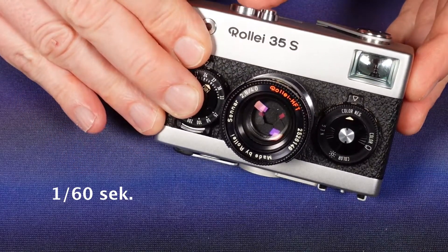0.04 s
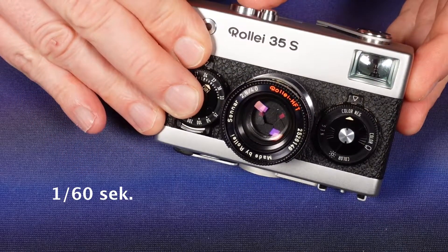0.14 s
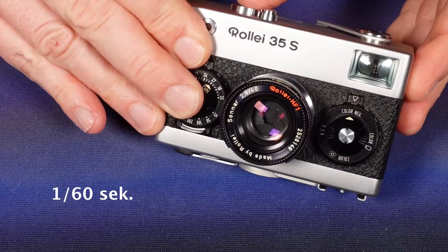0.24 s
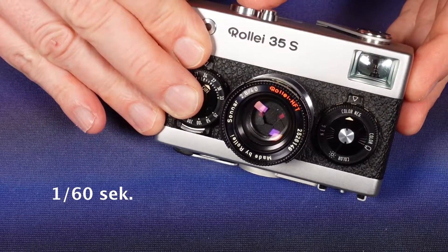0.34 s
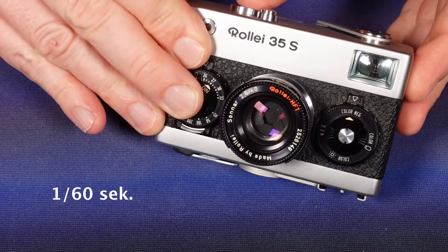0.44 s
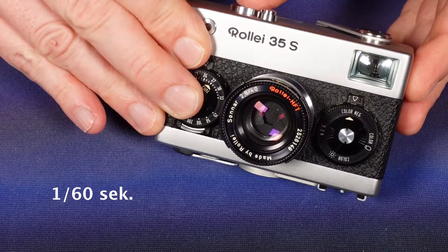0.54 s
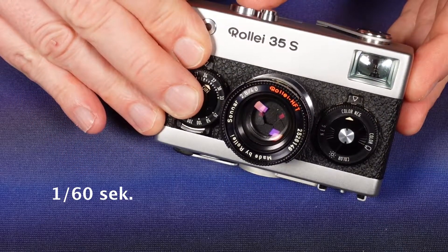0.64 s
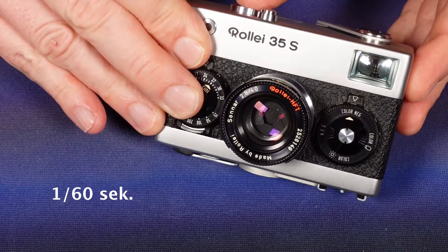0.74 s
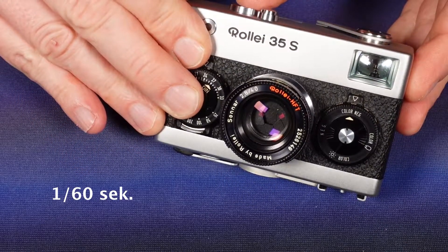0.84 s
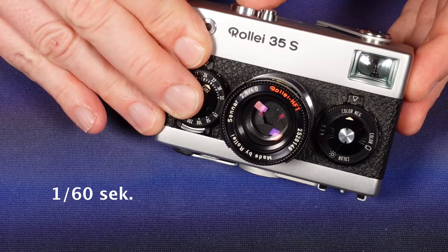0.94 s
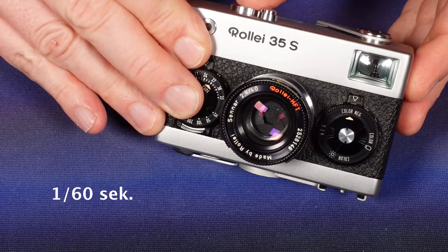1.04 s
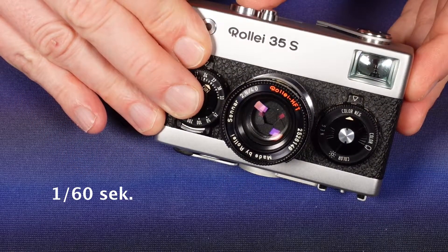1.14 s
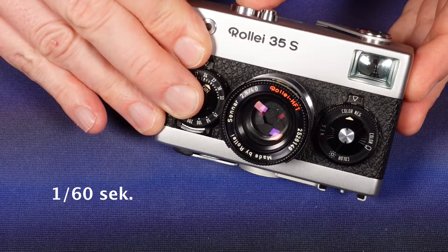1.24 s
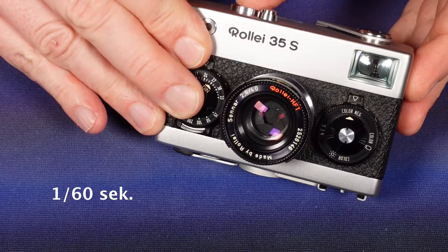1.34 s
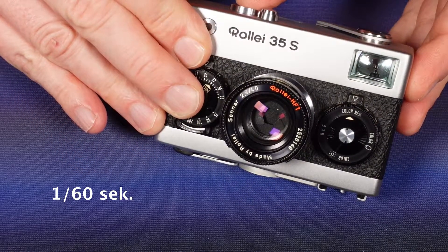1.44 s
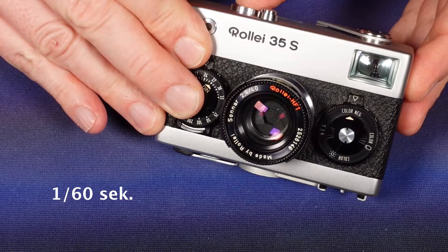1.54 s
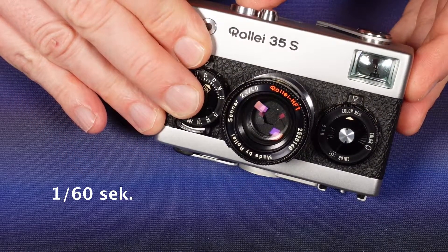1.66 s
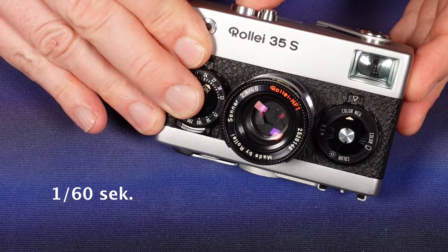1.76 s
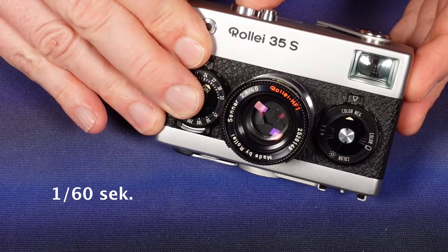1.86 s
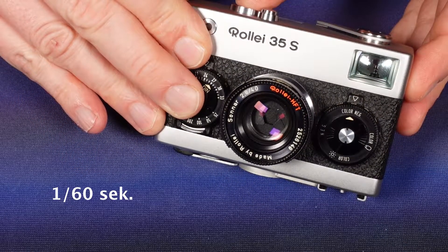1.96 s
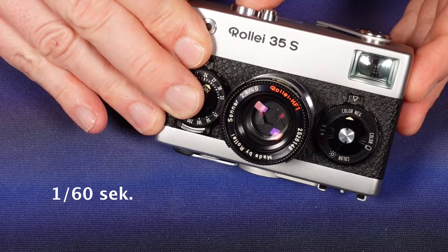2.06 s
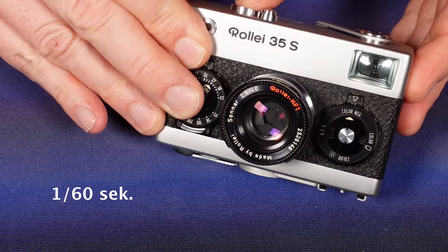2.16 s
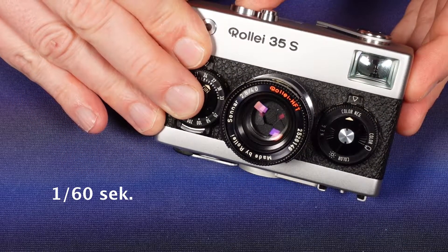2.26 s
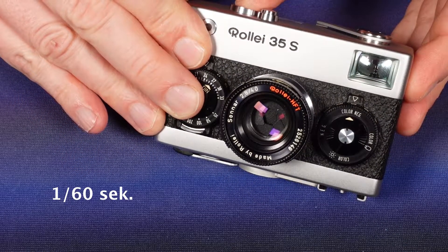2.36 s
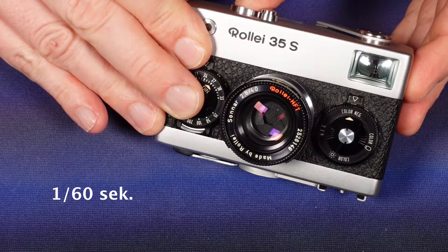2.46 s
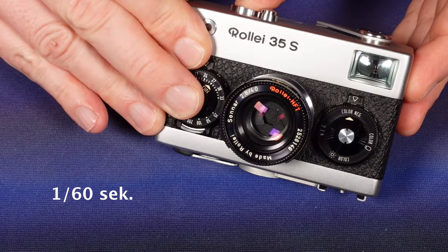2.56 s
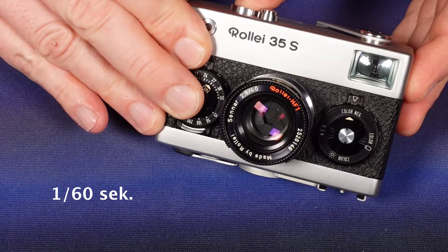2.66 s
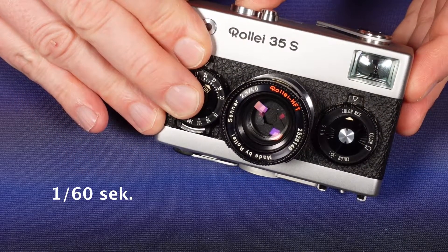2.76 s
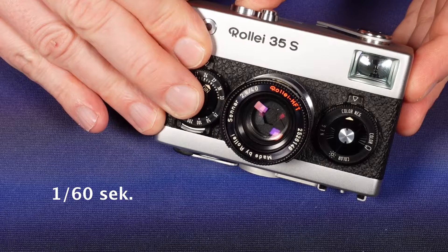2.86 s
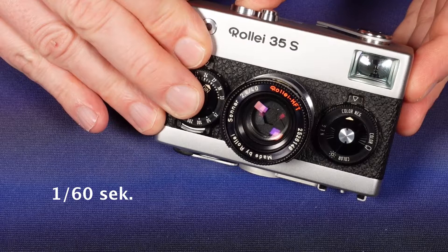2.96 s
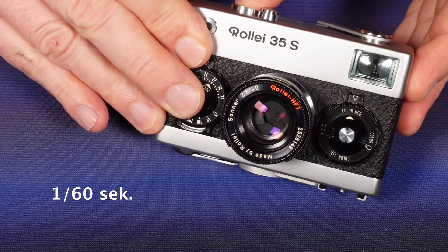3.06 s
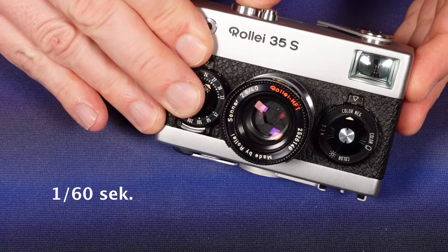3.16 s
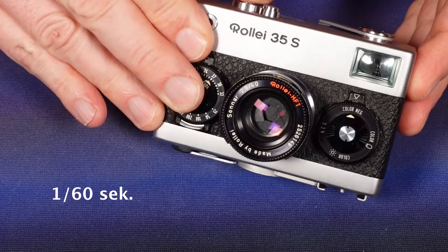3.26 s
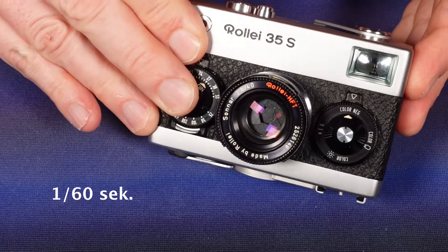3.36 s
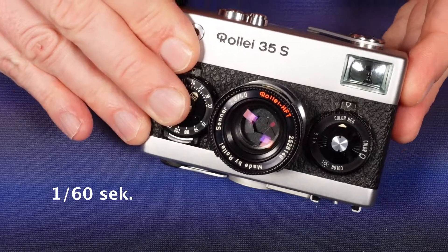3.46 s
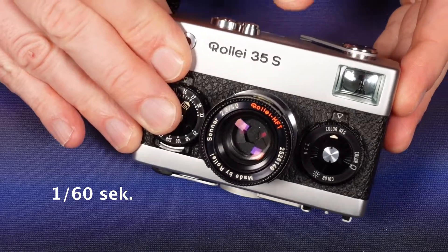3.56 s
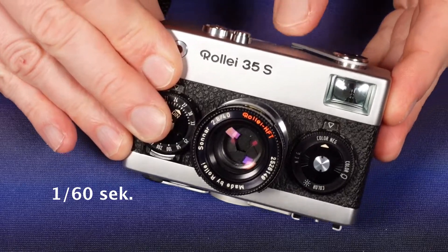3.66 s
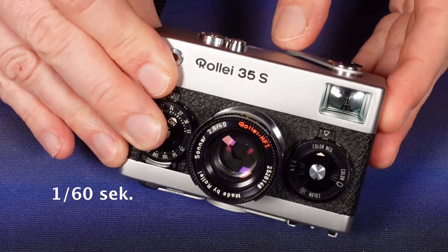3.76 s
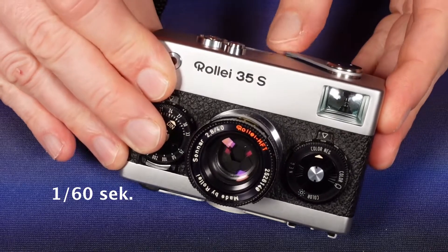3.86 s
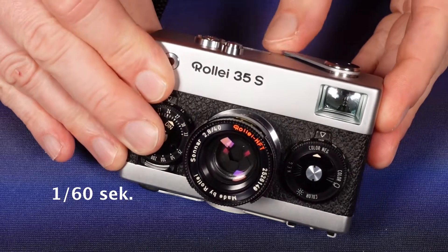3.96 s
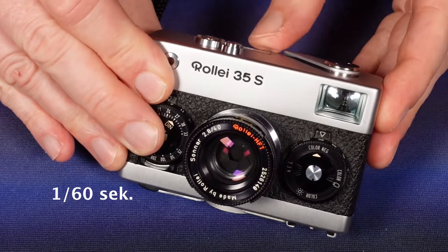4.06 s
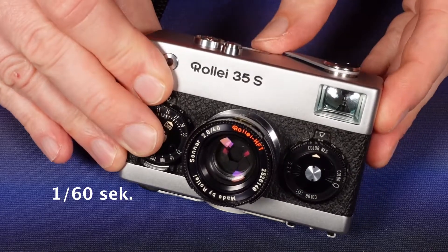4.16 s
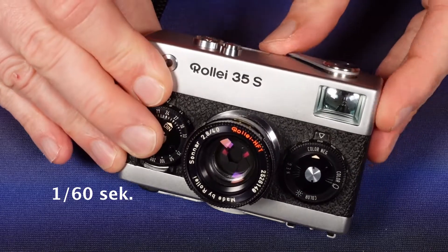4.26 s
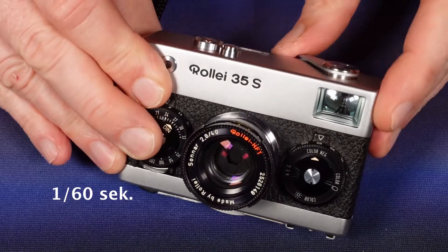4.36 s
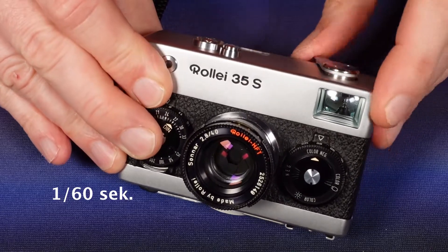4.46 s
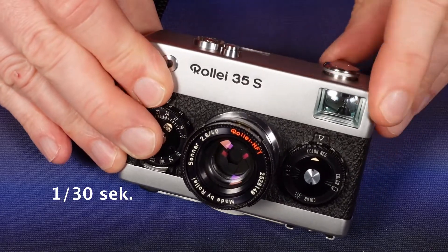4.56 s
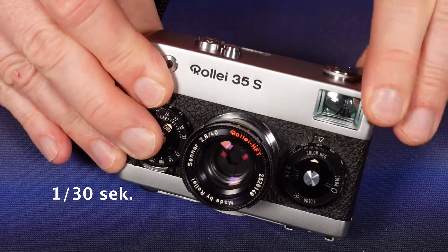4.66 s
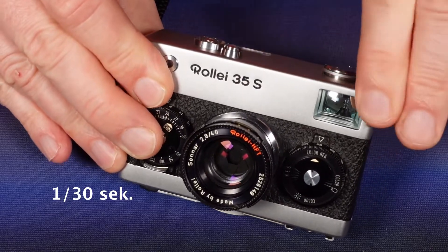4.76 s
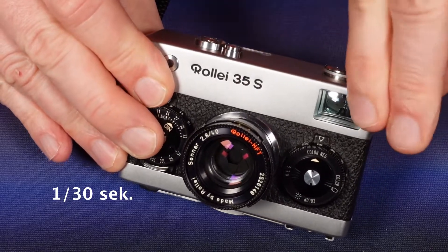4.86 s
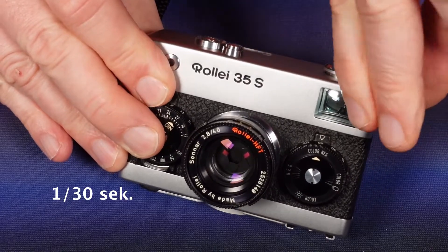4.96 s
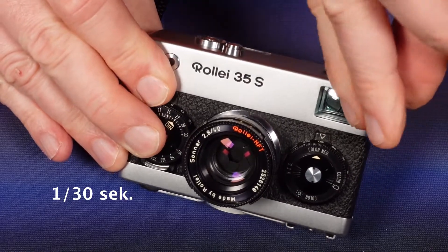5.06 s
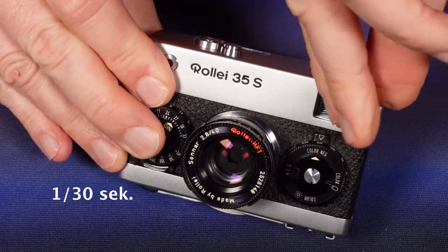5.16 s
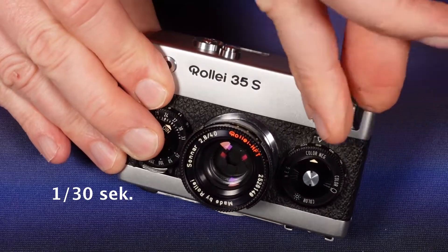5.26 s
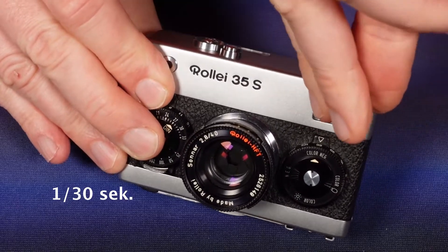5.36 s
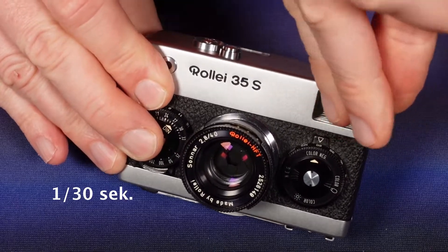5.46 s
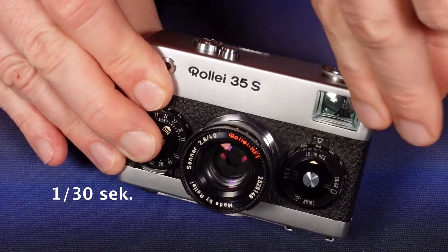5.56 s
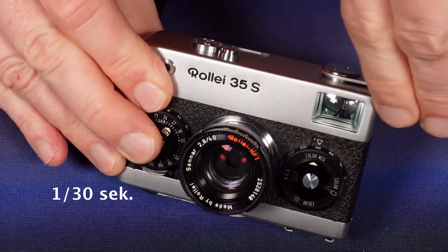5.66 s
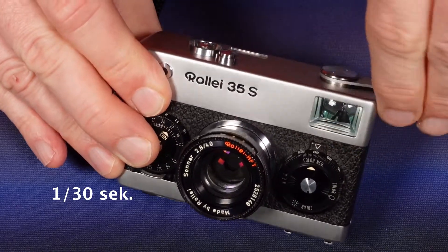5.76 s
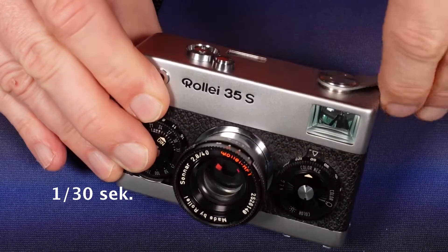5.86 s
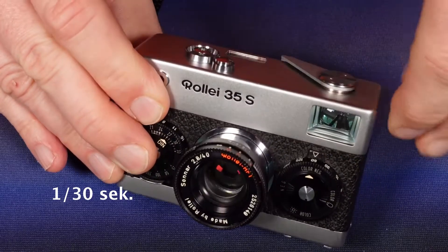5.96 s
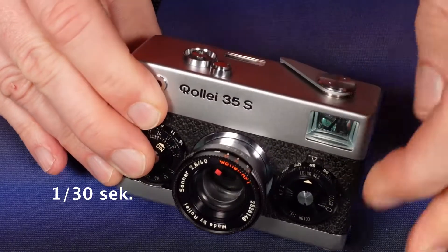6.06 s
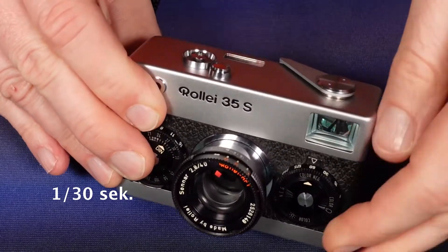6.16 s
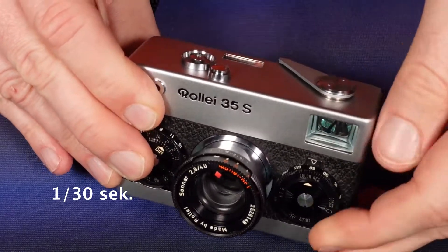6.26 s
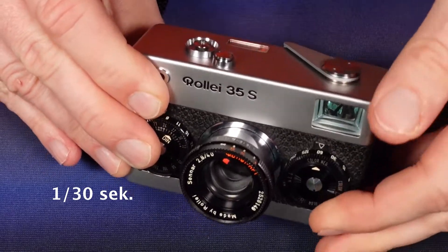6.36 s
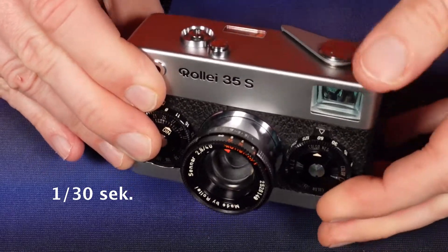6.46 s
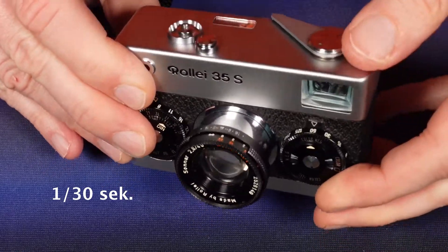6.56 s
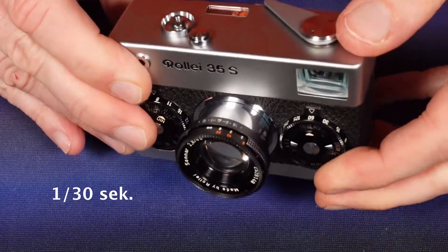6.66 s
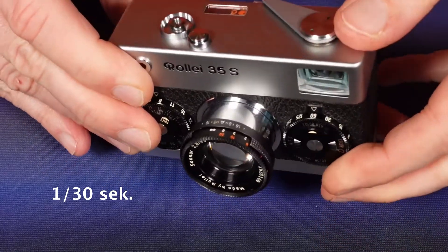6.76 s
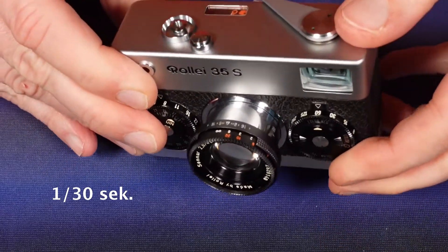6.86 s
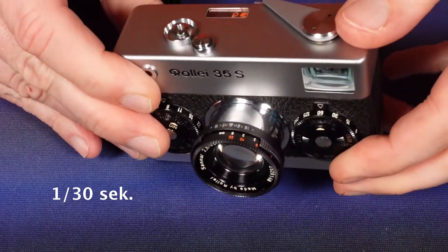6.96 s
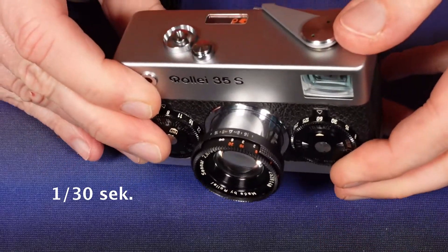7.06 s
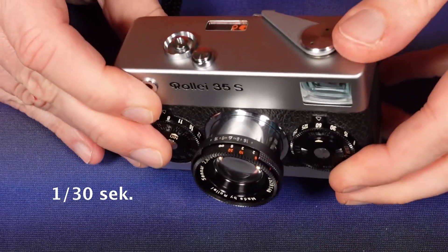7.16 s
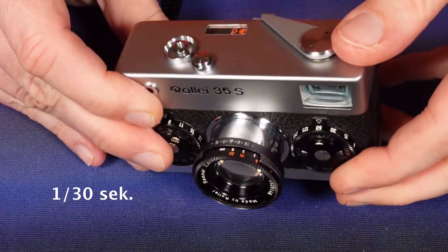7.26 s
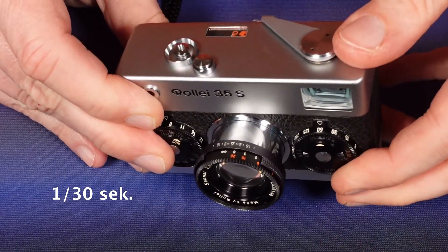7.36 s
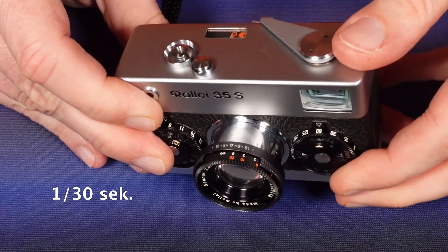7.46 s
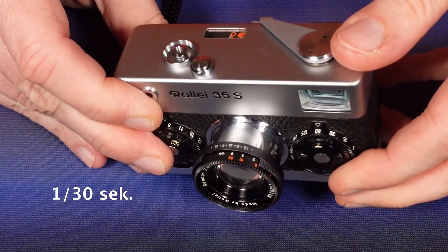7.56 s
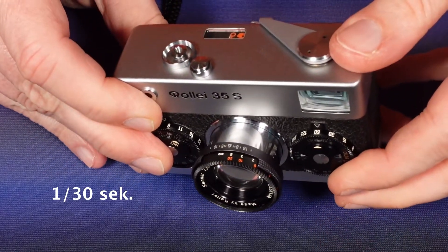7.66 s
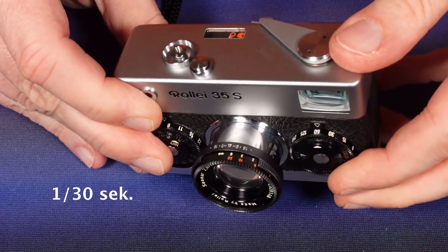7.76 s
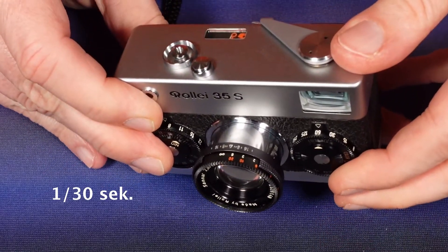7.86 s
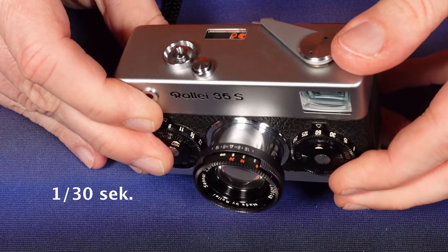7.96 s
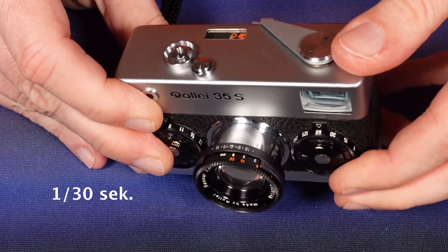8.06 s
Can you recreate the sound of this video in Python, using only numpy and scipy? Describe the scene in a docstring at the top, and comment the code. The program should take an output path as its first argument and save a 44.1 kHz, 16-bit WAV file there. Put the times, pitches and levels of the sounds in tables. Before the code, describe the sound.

Near silence with a faint clock tick, a sharp double shutter click, light handling taps, a ratcheting lever stroke, a loud metallic snap back.

```python
"""A leaf shutter opens and closes in a small metal film camera, handled close to the microphone.
Noise bursts ring its housing; brief pushes ring the hollow case and single impulses its plates, under cracks.
The wind lever swings out over a clicking ratchet, latches and snaps home: more cracks, and rings from grains.
Fingers rub and bump the case as coloured grains and slips; low thumps are slow decaying cosines.
Behind lie diffuse echoes, a quiet room of steady noise and a faint far tick about once a second."""
import sys
import numpy as np
from scipy import signal
from scipy.fft import rfft, irfft, next_fast_len
from scipy.io import wavfile
from scipy.ndimage import uniform_filter1d

SR = 44100
rng = np.random.default_rng(int(sys.argv[2]) if len(sys.argv) > 2 else 0)


def pcm_store(signal):
    """Save signal as 16-bit PCM."""
    levels = np.round(np.clip(np.atleast_2d(signal), -1, 1) * 32767)
    wavfile.write(sys.argv[1], SR, levels.astype(np.int16).T)


N = 357651
TIME = np.arange(N) / SR   # seconds

# Shutter blades reach their open and closed stops. Each row: start in seconds, level in dB.
BLADE_STOPS = [(2.227, -3), (2.245, -2.5)]
# Ringing of the shutter housing. Each row: frequency in Hz, width in Hz, level in dB.
HOUSING_MODES = [(520, 80, 14), (2050, 230, 11), (3100, 200, -5.5), (4350, 75, -6.5), (5620, 90, 4.5),
                 (6520, 160, -4), (9210, 84, -1), (11700, 160, -0.5)]
# Metal parts strike inside the case: the shutter fires, the button comes back up, the gears engage,
# the lever latches and meets its stop, snaps home, and settles. Each row: start in seconds,
# crack level in dB, hollow case ring in dB, plate ring in dB, treble lift in dB.
METAL_STRIKES = [ (2.2222, -18, 7, -12.5, -6.5), (2.2247, 3, -6.5, -14, 4), (2.243, 1.5, -17, -13, 4),
                 (2.2458, -13, 9.5, -8, 0), (2.2662, -18, -12, -5, 4), (3.1541, -36, -9, -7, -14),
                 (3.1742, -37.5, -3, -5, 7), (4.6531, -18, 6, 10.5, -3), (5.171, -9, -18, -1.5, 14.5),
                 (5.183, -25, -14, -12, 5), (5.2057, -17, 2.5, 8, 1.5), (5.2082, -9, -7, -5, -1),
                 (5.2123, -18, -4.5, -7, -7), (5.85, -10, -12, -9.5, 6.5), (5.911, -17.5, -13, -10, -2),
                 (5.9172, -12.5, -8, -7, 2.5), (5.9227, 13, -14, 1.5, 3.5), (5.932, -1.5, -15.5, -2, -5.5),
                 (6.5935, -35, -24, -12, 5)]
# Base colour of a metal crack. Each row: frequency in Hz, spectral level in dB.
CRACK_COLOUR = [(150, -8), (400, -4), (800, -3.5), (1300, -2.5), (2100, 0), (3300, 0), (5500, -1),
                (7500, -5), (9500, -1), (12000, -6), (16000, -10.5)]
# Hollow modes of the case. Each row: frequency in Hz, width in Hz, level in dB.
CASE_MODES = [(185, 55, 22), (511, 110, 16.5), (614, 33, 2)]
# Ringing plates and springs. Each row: frequency in Hz, width in Hz, level in dB.
PLATE_MODES = [(1589, 30, 4), (2010, 120, -1), (2640, 50, -2), (2828, 67, 4), (3060, 40, -3),
               (3475, 37, 2.5), (4980, 30, 0.5), (5640, 30, -1.5), (7150, 19, -2), (8000, 43, -3),
               (9230, 31, -2.5)]
# The pawl drops over each tooth. Each row: start in seconds, relative level in dB.
RATCHET_TEETH = [(4.446, -21), (4.4995, -19.5), (4.5386, -17), (4.5777, -14.5), (4.6185, -14.5),
                 (4.6727, -10), (4.694, -13), (4.714, -10), (4.7405, -12), (4.7658, -14.5), (4.7935, -15.5),
                 (4.8309, -15), (4.8594, -14), (4.8868, -15), (4.9173, -13.5), (4.9494, -15), (4.9879, -12),
                 (5.03, -13.5), (5.0645, -15), (5.1387, -16)]
# Ringing of the pawl. Each row: frequency in Hz, width in Hz, relative level in dB.
PAWL_MODES = [(1800, 45, -1.5), (2290, 120, -4.5), (3350, 210, -6.5), (5070, 440, -4.5), (6100, 470, -8),
              (7460, 160, -7), (9400, 1400, -6.5), (11300, 470, -11), (13000, 320, -12)]
# The lever spring pings on the way back. Each row: start in seconds, relative level in dB.
SPRING_PINGS = [(5.5927, -12.5)]
# Ringing of the lever spring. Each row: frequency in Hz, width in Hz, relative level in dB.
SPRING_RING = [(3740, 77, -4), (5900, 210, -7), (6650, 100, -9), (10300, 210, -14.5), (13790, 310, -16.5)]
# The lever turns on its pivot, out, back and home. Each row: start in seconds, length in seconds, level in dB.
LEVER_SWINGS = [(4.2, .18, -60), (4.425, .045, -47), (4.48, .66, -55.5), (5.45, .27, -53), (5.79, .11, -44)]
# Ringing of the rubbed pivot. Each row: frequency in Hz, width in Hz, relative level in dB.
PIVOT_RING = [(679, 480, -0.5), (1770, 370, 4), (2533, 500, -9), (3500, 600, -13)]
# The thumb brushes the top plate. Each row: start in seconds, length in seconds, level in dB.
THUMB_BRUSHES = [(3.98, 0.19, -53.5), (6.33, 0.4, -57)]
# Ringing of the brushed top plate. Each row: frequency in Hz, width in Hz, relative level in dB.
TOP_PLATE_MODES = [(1680, 690, -4), (3080, 2100, -1), (5020, 510, -0.5)]
# Duller knocks of outer parts under the fingers. Each row: start in seconds, relative level in dB,
# hollow case ring in dB, low-pass corner of the contact in Hz.
PART_KNOCKS = [(3.068, -43, -12, 3000), (3.1078, -40.5, -16, 3000), (3.213, -37.5, -16, 5000),
               (3.2866, -44, -18, 4000), (3.352, -43, -17, 5000), (3.8268, -22, -19, 500),
               (4.2207, -42, -10, 2490), (4.3975, -38, -9, 4500), (4.821, -36, 5.5, 1500),
               (5.8015, -30, -4, 2206), (5.8190, -20.5, 1, 2300), (5.8702, -29, -6, 3000),
               (6.29, -33, 3, 4000), (7.304, -15, -12, 4930), (7.4776, -24, -5, 3000)]
# Ringing of the outer parts. Each row: frequency in Hz, width in Hz, relative level in dB.
OUTER_PART_MODES = [(980, 220, -2), (1270, 190, 4.5), (1950, 1100, -3), (2610, 280, 4.5), (3050, 800, 2),
                    (4070, 130, -2), (9000, 4000, -3)]
# Dull low thumps of the camera: shutter, latch and lever blows, and bumps of the hand.
# Each row: start in seconds, level in dB, contact time in seconds.
LOW_THUMPS = [(2.226, -24, .012), (2.243, -31, .001), (3.114, -41, .004), (3.175, -36.5, .004),
              (3.8228, -10.5, .005), (4.089, -34, .005), (4.252, -43, .003), (4.28, -39, .003),
              (4.79, -31, .005), (5.172, -31.5, .004), (5.207, -22, .004), (5.228, -16.5, .013),
              (5.925, -16, .0045), (5.949, -21, .004), (6.207, -28, .004), (6.423, -34, .008),
              (7.299, -20.5, .0075)]
# The held camera rocks. Each row: frequency in Hz, level in dB, time to fall 60 dB in seconds.
ROCKING_MODES = [(37, -9, .28), (61, -1, .24), (86, -3, .17), (140, -1, .11), (170, 4, 0.078),
                 (315, 4, .04)]
# Skin slides on the case. Each row: start in seconds, length in seconds, level in dB.
SKIN_SLIDES = [(3.12, .1, -51.5), (3.3, .26, -59.5), (3.61, .17, -52), (4.56, .29, -44.5), (5.75, .2, -50)]
# Colour of sliding skin. Each row: frequency in Hz, spectral level in dB.
SKIN_COLOUR = [(200, 11), (450, 9), (700, 4), (1100, 2.5), (1800, 0), (3500, -1), (6000, -7.5), (10000, -9),
               (16000, -16)]
# The grip shifts. Each row: start in seconds, length in seconds, rumble level in dB.
GRIP_SHIFTS = [(3.02, 0.59, -45.5), (3.7, 0.92, -43.5), (4.6, .45, -37), (5.0, .85, -44), (5.8, .68, -39),
               (7.25, 0.39, -48)]
# Colour of the grip's rumble. Each row: frequency in Hz, spectral level in dB.
RUMBLE_COLOUR = [(20, 1), (55, 1), (100, -7), (180, -6.5), (300, -20), (600, -29.5), (1500, -64.5)]
# Colour of the far tick. Each row: frequency in Hz, spectral level in dB.
FAR_TICK_COLOUR = [(200, -5), (400, 3), (770, 9), (1000, 1), (1700, -6), (2600, -6.5), (3600, -2),
                   (4700, -19), (6000, -4.5), (7500, -17), (15000, -22.5)]
# Colour of the still room. Each row: frequency in Hz, relative spectral level in dB.
QUIET_COLOUR = [(12, -23.5), (20, 1.5), (34, -4.5), (49, -15), (78, -13), (115, -27.5), (191, -13.5),
                (238, -20.5), (323, -24), (372, -30), (505, -32.5), (856, -34.5), (1300, -38.5),
                (8160, -41), (15500, -43.5)]
# How long the echo hangs. Each row: frequency in Hz, time to fall 60 dB in seconds.
ECHO_T60 = [(150, 0.13), (600, .5), (1500, 0.55), (3800, .5), (8000, 0.41), (15000, 0.19)]
# How strong the echo is. Each row: frequency in Hz, relative echo level in dB.
ECHO_LEVEL = [(150, -9.5), (600, -12.5), (1500, -17), (3800, -13.5), (8000, -15), (15000, -15.5)]

PUSH = np.hanning(12)   # the shape of one brief push, in samples
STRIKE_FADE_S = .0027   # decay time constant of a metal crack
PAWL_VARY_DB, PAWL_VARY_SHARE = 2.5, .02   # scatter from tooth to tooth: level, share of pitch
# the film transport gears take up the load, then run free
GEAR_START_S, GEAR_HOLD_S, GEAR_DB, GEAR_SAG_DB_PER_S = 4.648, 0.063, -31.5, 38
STROKE_FULLNESS = 0.72   # power of the arch that every stroke follows; lower is flatter
STROKE_UNEVEN_DB, STROKE_UNEVEN_HZ = 1.5, 45   # how much and how fast a stroke catches and frees itself
# a fingertip judders over the case, faster and lighter as it goes
JUDDER_START_S, JUDDER_HOLD_S, JUDDER_DB, JUDDER_SAG_DB_PER_S = 6.203, .078, -22, 135
JUDDER_SLIPS_PER_S, JUDDER_GAINS_SLIPS_PER_S = 185, 65   # at the start; added by the end
CLOCK_FIRST_S, CLOCK_PERIOD_S = .478, 1.001
TICK_DB, TOCK_DB = -51.5, -55.5   # tick and tock take turns
QUIET_DB = -48.5
CUTOFF_HZ = 15900


def from_db(db):
    """Turn decibels into gain."""
    return 10 ** (np.asarray(db) / 20)


def rms_one(x):
    """Bring a sound to rms 1."""
    return x / np.sqrt(np.mean(x ** 2) + 1e-20)


def at_hz(points, hz):
    """Read a table on a log-frequency axis."""
    f, value = np.transpose(points)
    return np.interp(np.log(np.maximum(hz, 1)), np.log(f), value)


def add(out, s, sound):
    """Mix a sound in at a given time."""
    at = round(s * SR)
    out[at:at + len(sound)] += sound[:N - at]


def colour(x, spectrum):
    """Give steady noise a spectrum; rms 1."""
    size = next_fast_len(len(x))
    gain = from_db(at_hz(spectrum, np.fft.rfftfreq(size, 1 / SR)))
    return rms_one(irfft(rfft(x, size) * gain, size)[:len(x)])


def low_pass(x, hz):
    """Dull a sound above a corner frequency."""
    return signal.sosfilt(signal.butter(2, hz, fs=SR, output="sos"), x)


def resonate(x, modes):
    """Ring parallel resonances; a wider one dies sooner."""
    out = 0
    for hz, width, db in modes:
        r = np.exp(-np.pi * width / SR)
        poles = [1, -2 * r * np.cos(2 * np.pi * hz / SR), r * r]
        ring = signal.lfilter([1, 0, -1], poles, x + 1e-18)
        out = out + from_db(db) * (1 - r * r) / 2 * ring
    return out


def burst(spectrum, rise, fade, size=4096):
    """Countless short-lived modes sound as noise that swells and dies."""
    t = TIME[:size]
    noise = colour(rng.standard_normal(size), spectrum)
    noise = noise / np.sqrt(uniform_filter1d(noise ** 2, size=90) + 1e-9)   # even out the loudness
    return noise * np.minimum(t / rise, 1) * np.exp(-np.maximum(t - rise, 0) / fade)


def grains(per_s, spread_db):
    """Tiny random catches between two rubbing surfaces."""
    sizes = from_db(spread_db * np.minimum(rng.exponential(1, N), 4))
    signs = rng.choice([-1, 1], N)
    return sizes * signs * (rng.random(N) < per_s / SR)


def strokes(rows):
    """Gain over time: each stroke gathers speed and slows again in one uneven arch."""
    arch = np.hanning(65) ** (abs(STROKE_FULLNESS) / 2)
    speed = np.zeros(N)
    for start, length, db in rows:
        speed += from_db(db) * np.interp(TIME, np.linspace(start, start + length, len(arch)), arch)
    catching = rms_one(low_pass(rng.standard_normal(N), STROKE_UNEVEN_HZ))
    return speed * from_db(STROKE_UNEVEN_DB * catching)


def pressure(start, hold, sag_db_per_s, attack, release):
    """Gain over time of a push that builds fast, sags while held and lets go."""
    t = np.maximum(TIME - start, 0)
    letting_go = np.exp(-np.clip((t - attack - hold) / release, 0, 20))
    return np.minimum(t / attack, 1) * from_db(-sag_db_per_s * t) * letting_go


def shutter(rise=0.00065, fade=0.0047):
    """Each stop of the blades sets their housing singing briefly."""
    stops = np.zeros(N)
    for s, db in BLADE_STOPS:
        add(stops, s, from_db(db) * burst([(1000, -5.5), (16000, -3.5)], rise, fade))
    return resonate(stops, HOUSING_MODES)


def strikes(rise=0.0008, treble_hz=4500):
    """Shutter blades, latch and lever hit their stops and set the case and its plates ringing."""
    crack, shove, flex = np.zeros((3, N))
    for s, db, hollow_db, plate_db, treble_db in METAL_STRIKES:
        spectrum = [(hz, base + treble_db * hz ** 2 / (hz ** 2 + treble_hz ** 2)) for hz, base in CRACK_COLOUR]
        hit = from_db(db) * burst(spectrum, rise, STRIKE_FADE_S)
        add(crack, s, hit)
        # the slow modes feel a blow as one short push
        add(shove, s, from_db(db + hollow_db) * PUSH)
        # the plates take a share of its energy at once
        add(flex, s, [from_db(plate_db) * np.sqrt(np.sum(hit ** 2))])
    return crack + resonate(shove, CASE_MODES) + resonate(flex, PLATE_MODES)


def ratchet(rise=0.00061, fade=0.0019, ring_db=1.5, tick_db=-10.0):
    """The pawl drops from tooth to tooth, its modes scattered a little each time."""
    clicks = np.zeros(N)
    for s, db in RATCHET_TEETH:
        drop = from_db(db) * burst([(800, -9.5), (2000, -10.5), (5000, -6), (16000, -5)], rise, fade)
        modes = []
        for hz, width, mode_db in PAWL_MODES:
            modes.append((hz * rng.normal(1, PAWL_VARY_SHARE), width, rng.normal(mode_db, PAWL_VARY_DB)))
        add(clicks, s, from_db(ring_db) * resonate(drop, modes) + from_db(tick_db) * drop)
    return clicks


def gears():
    """Loaded gear teeth mesh in fine grains and whirr through the same steel as the pawl."""
    mesh = grains(per_s=1300, spread_db=3.5)
    load = pressure(GEAR_START_S, GEAR_HOLD_S, GEAR_SAG_DB_PER_S, attack=0.0073, release=0.022)
    return from_db(GEAR_DB) * load * rms_one(resonate(mesh, PAWL_MODES) + .9 * mesh)


def spring(ring_db=3.0, tick_db=-7.5):
    """A brief kick rings the spring in one light ping as the lever swings back."""
    kick = np.zeros(N)
    for s, db in SPRING_PINGS:
        snap = burst([(1200, -18), (2500, 4.0), (6000, -8), (15000, -15)], rise=.0007, fade=.001)
        add(kick, s, from_db(db) * snap)
    return from_db(ring_db) * resonate(kick, SPRING_RING) + from_db(tick_db) * kick


def rubbing():
    """Fine friction rings the lever's pivot low and the top plate high."""
    friction = grains(per_s=2000, spread_db=4.0)
    pivot = strokes(LEVER_SWINGS) * rms_one(resonate(friction, PIVOT_RING))
    top_plate = strokes(THUMB_BRUSHES) * rms_one(resonate(friction, TOP_PLATE_MODES))
    return pivot + top_plate


def knocks(rise=0.00061, fade=0.0013, ring_db=1.5, dry_db=-4.5):
    """Parts damped by the hand knock briefly; a softer contact is duller."""
    taps, shove = np.zeros((2, N))
    for s, db, hollow_db, bright_hz in PART_KNOCKS:
        contact = burst([(100, 0.00035), (16000, 0)], rise, fade)
        add(taps, s, from_db(db) * low_pass(contact, bright_hz))
        add(shove, s, from_db(db + hollow_db) * PUSH)
    ring = from_db(ring_db) * resonate(taps, OUTER_PART_MODES)
    return ring + from_db(dry_db) * taps + resonate(shove, CASE_MODES)


def thumps():
    """Blows and bumps rock the camera for a few slow cycles; a longer contact is duller."""
    out, t = np.zeros(N), TIME[:SR // 2]
    rocking = sum(from_db(db - 60 * t / t60) * np.cos(2 * np.pi * hz * t) for hz, db, t60 in ROCKING_MODES)
    for s, db, contact_s in LOW_THUMPS:
        push = np.sin(np.pi * np.minimum(t / contact_s, 1)) ** 2
        add(out, s, -from_db(db) * signal.fftconvolve(rocking, push / push.sum()))
    return out


def judder(skin, unsteady=0.2, grit_db=-15.5, scrape_db=-17.0):
    """A fingertip sticks and slips at an unsteady, rising rate; each slip throbs and scratches."""
    progress = np.clip((TIME - JUDDER_START_S) / JUDDER_HOLD_S, 0, 1)
    per_s = JUDDER_SLIPS_PER_S + JUDDER_GAINS_SLIPS_PER_S * progress
    wander = rms_one(low_pass(rng.standard_normal(N), 90.4))
    phase = np.cumsum(per_s * np.exp(unsteady * wander)) / SR
    slips = np.diff(np.floor(phase), prepend=0)   # one impulse per slip
    throb = rms_one(low_pass(resonate(slips, [(217, 62, 14), (550, 145, -7)]), 570))
    scratch = low_pass(slips, 390) * rng.standard_normal(N)
    grit = rms_one(resonate(scratch, [(3000, 650, 0)]))
    press = pressure(JUDDER_START_S, JUDDER_HOLD_S, JUDDER_SAG_DB_PER_S, attack=.011, release=0.0054)
    return from_db(JUDDER_DB) * press * (throb + from_db(grit_db) * grit + from_db(scrape_db) * skin)


def fingers(grip_rub_db=-17.0):
    """Skin slides in fine grains, judders, and rumbles through the grip."""
    skin = colour(grains(per_s=6000, spread_db=2.5), SKIN_COLOUR)
    rumble = colour(rng.standard_normal(N), RUMBLE_COLOUR)
    grip = strokes(GRIP_SHIFTS) * (rumble + from_db(grip_rub_db) * skin)
    return strokes(SKIN_SLIDES) * skin + judder(skin) + grip


def room(x, first_s=.006, build_s=0.0043):
    """Diffuse echoes build up after the first wall and die at a rate of their own in each band."""
    t, tail = TIME[:SR * 3 // 4], 0
    edges = np.geomspace(80, 18000, 9)   # Hz
    for low, high in zip(edges, edges[1:]):
        hz = np.sqrt(low * high)
        band_pass = signal.butter(2, [low, high], "band", fs=SR, output="sos")
        band = signal.sosfilt(band_pass, rng.standard_normal(len(t)))
        shape = from_db(-60 * t / at_hz(ECHO_T60, hz)) * np.clip((t - first_s) / build_s, 0, 1)
        tail = tail + from_db(at_hz(ECHO_LEVEL, hz)) * band * shape / np.sqrt(np.sum(shape ** 2))
    return signal.fftconvolve(x, tail)[:N]


def far_ticks():
    """Probably a clock across the room: soft noise swells with long fades, tick and tock in turn."""
    out = np.zeros(N)
    for k, s in enumerate(np.arange(CLOCK_FIRST_S, N / SR, CLOCK_PERIOD_S)):
        level = from_db(TOCK_DB if k % 2 else TICK_DB)
        add(out, s, level * burst(FAR_TICK_COLOUR, rise=.015, fade=0.049, size=22050))
    return out


def still_room(whine_db=-74.0):
    """Steady coloured noise, with a faint whine from noise through one narrow resonance."""
    quiet = from_db(QUIET_DB) * colour(rng.standard_normal(N), QUIET_COLOUR)
    whine = rms_one(resonate(rng.standard_normal(N), [(841, 48, 0)]))
    return quiet + from_db(whine_db) * whine


def scene(parts_echo_db=-5.0, low_echo_db=-1.5, knock_echo_db=-1.0, count=6):
    """The camera up close, its echo, the far tick and the still room."""
    parts = shutter() + ratchet() + gears() + rubbing() + spring()
    thumps_and_fingers, knocking = thumps() + fingers(), knocks()
    # the case throws a different colour at the walls in every direction, which evens out the echo of the snaps
    echo = sum(room(strikes()) for side in range(count)) / np.sqrt(count)
    softer = from_db(parts_echo_db) * parts + from_db(knock_echo_db) * knocking
    softer = softer + from_db(low_echo_db) * thumps_and_fingers
    echo = echo + room(softer)
    return (strikes() + parts + thumps_and_fingers + knocking + echo + far_ticks() + still_room())[None]


def record(dry):
    """Peaks beyond the input's limit are clipped flat; the top of the treble is cut steeply."""
    clipped = np.clip(dry, -.95, .95)
    return signal.sosfilt(signal.ellip(10, .1, 70, CUTOFF_HZ, fs=SR, output="sos"), clipped)


dry = scene()
out = record(dry)
pcm_store(out)
```